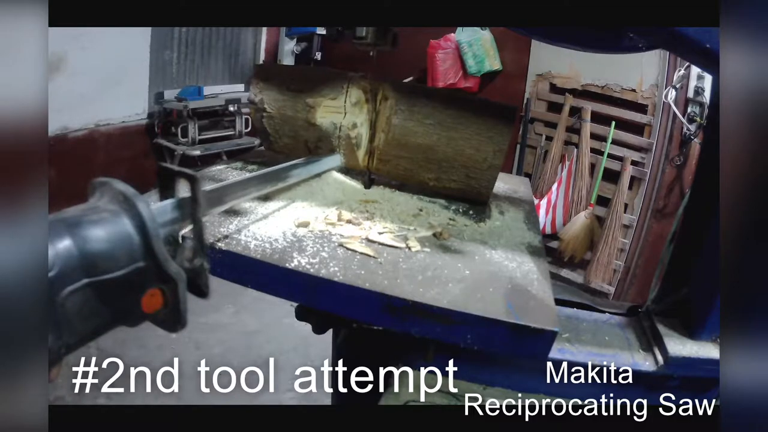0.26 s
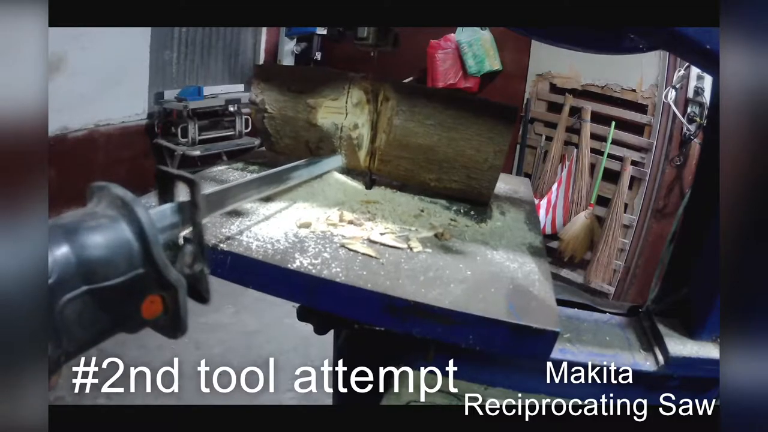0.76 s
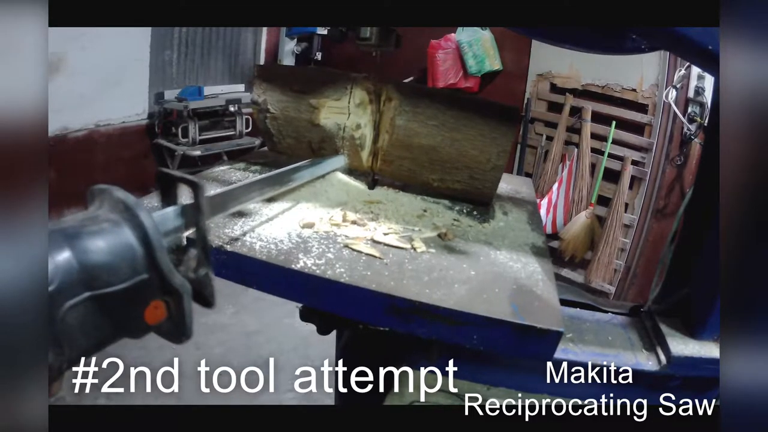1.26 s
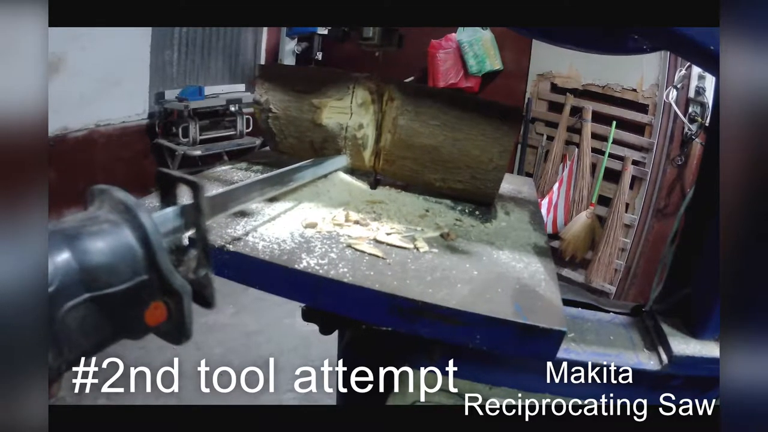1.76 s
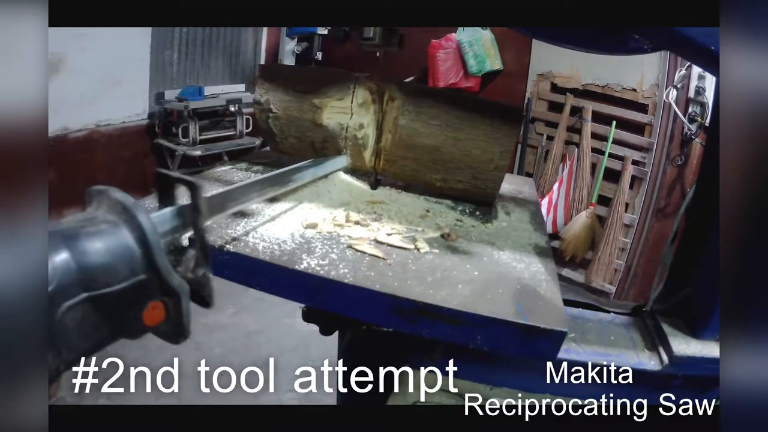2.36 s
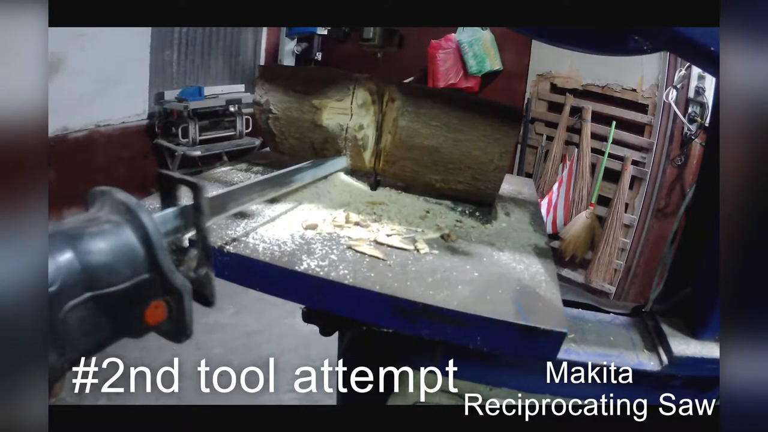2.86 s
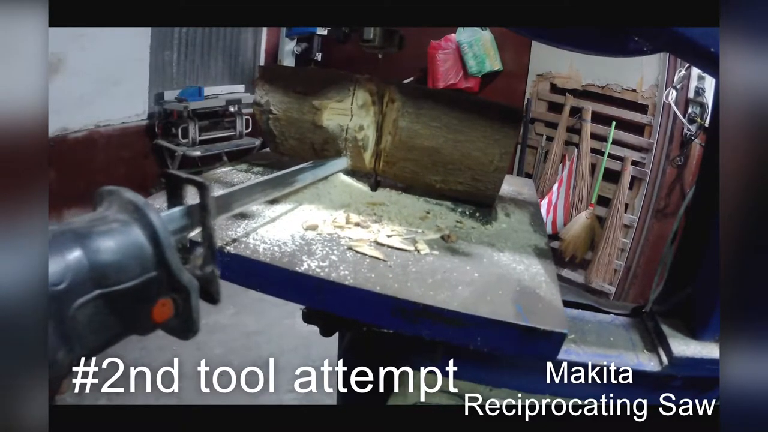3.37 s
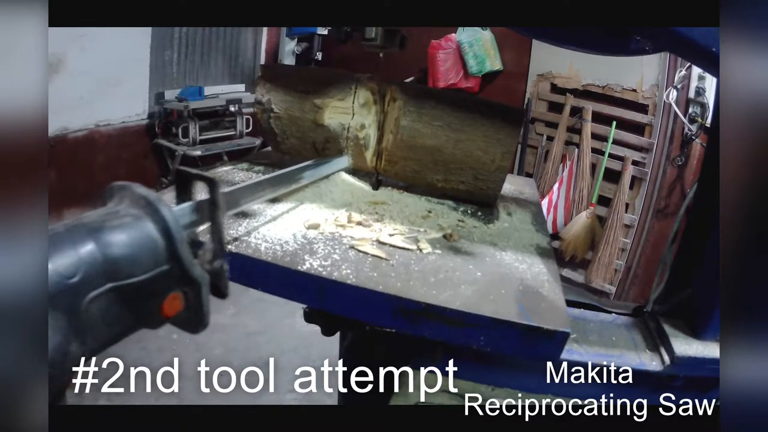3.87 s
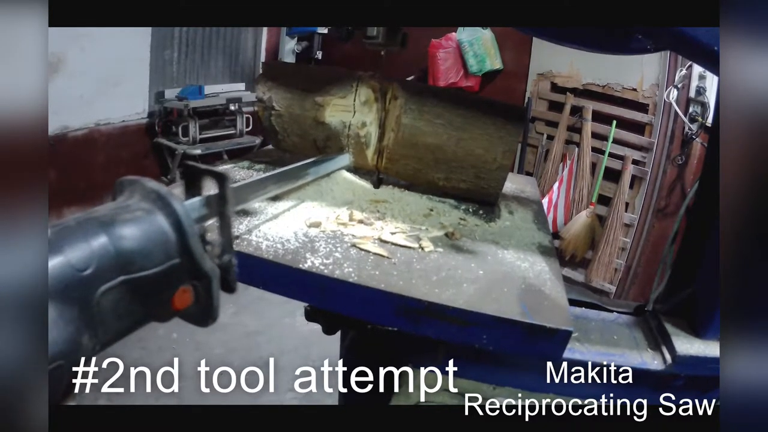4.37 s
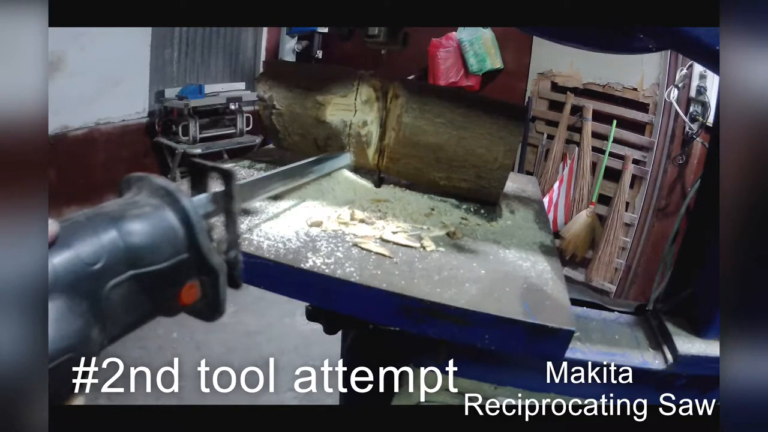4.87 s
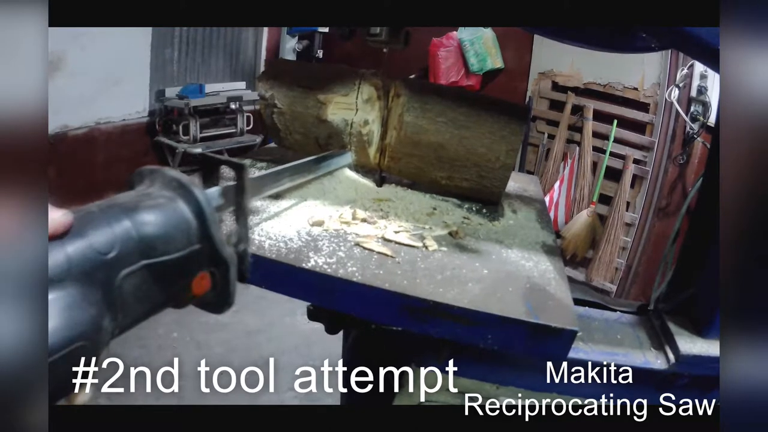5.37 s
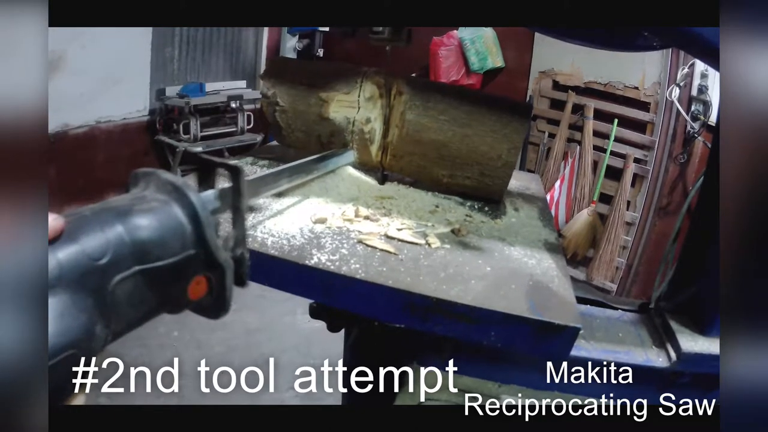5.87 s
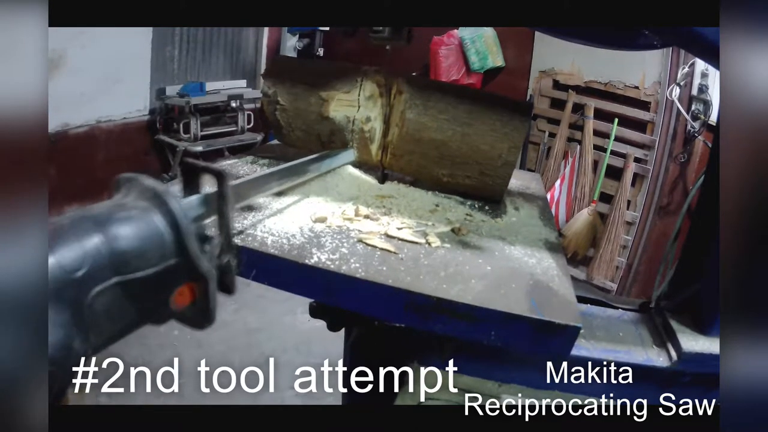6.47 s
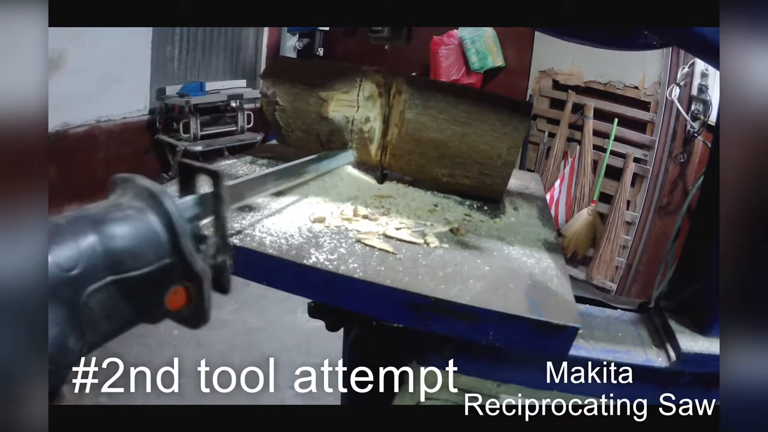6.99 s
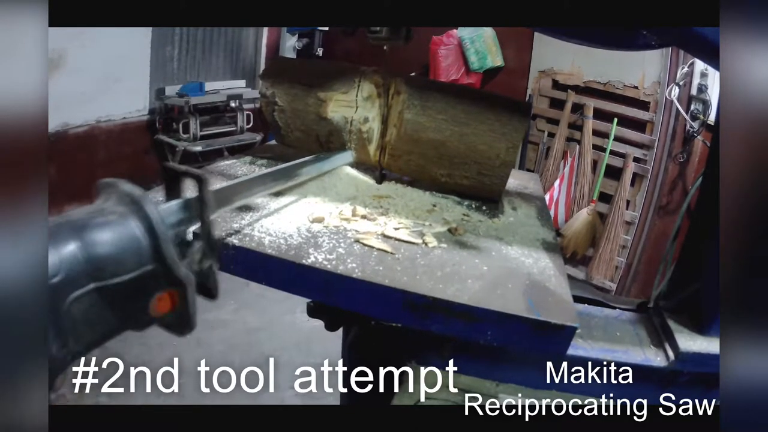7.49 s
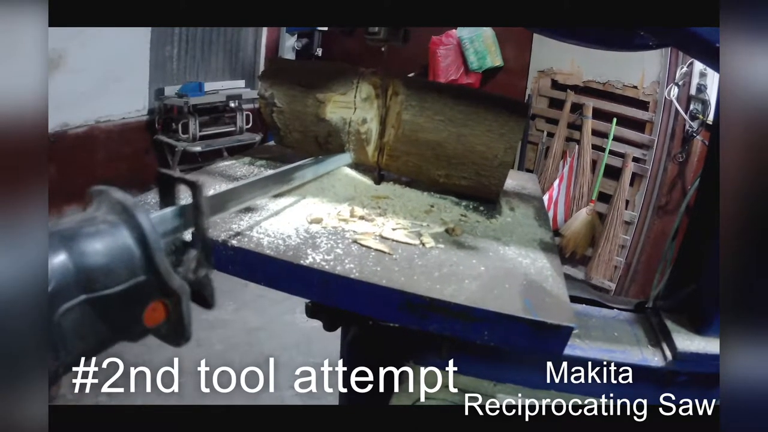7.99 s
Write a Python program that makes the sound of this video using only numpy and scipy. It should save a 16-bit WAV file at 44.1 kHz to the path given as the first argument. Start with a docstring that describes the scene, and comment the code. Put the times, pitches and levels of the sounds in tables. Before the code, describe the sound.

A power saw heard in slow motion chugs through a log with rapid woody knocking, dull rasping and a thin metallic sizzle on top.

```python
"""Reciprocating saw in slow motion

In a workshop a reciprocating saw cuts steadily into a round log on a steel table; one microphone channel.
Each turn of the crank knocks blade and shoe against the log several times: clicks and rattle ring its modes.
The teeth rasp as coloured noise; the motor hums and whines in sines; near walls answer the knocks.
The saw is heard at quarter speed: silent gaps between samples mirror it into a metallic sizzle around 11 kHz.
Faint dry ticks keep an even beat in the treble."""
import sys
import numpy as np
from scipy import signal
from scipy.fft import rfft, irfft
from scipy.io import wavfile
from scipy.ndimage import uniform_filter1d, map_coordinates

SR = 44100
rng = np.random.default_rng(int(sys.argv[2]) if len(sys.argv) > 2 else 0)


def materialize(psi):
    """Save the field psi as 16-bit PCM at rate SR to the path in sys.argv[1].

    A 1-D psi becomes a single channel; in a 2-D psi each row is a channel.
    """
    bounded = np.clip(np.atleast_2d(psi).T, -1, 1)
    quanta = np.round(bounded * 32767).astype(np.int16)
    wavfile.write(sys.argv[1], SR, quanta)


N = 363384


def from_db(db):
    """Amplitude factor of a level in dB."""
    return 10 ** (np.asarray(db) / 20)


def rms_one(x):
    """Scales a signal to rms 1."""
    return x / np.sqrt(np.mean(x ** 2) + 1e-20)


def seconds():
    """The time of every sample."""
    return np.arange(N) / SR


def in_time(rows):
    """The columns of a curve at every sample."""
    s, *columns = np.transpose(rows)
    return [np.interp(seconds(), s, column) for column in columns]


def drift(rate):
    """Smooth chance with about `rate` new values a second; rms 1."""
    knots = rng.standard_normal(N // 40)
    return rms_one(map_coordinates(knots, [seconds() * rate], order=3, mode="wrap"))


def coloured(x, spectrum):
    """Gives a white signal a spectrum with steep ends; rms 1."""
    hz, level_db = np.transpose(spectrum)
    f = np.maximum(np.arange(N // 2 + 1) * SR / N, 1)
    ends = np.minimum(f / hz[0], 1) ** 2 * np.minimum(hz[-1] / f, 1) ** 2
    shape = from_db(np.interp(np.log(f), np.log(hz), level_db))
    return rms_one(irfft(rfft(x) * ends * shape, N))


def band(x, low_hz, high_hz):
    """A causal band-pass."""
    sos = signal.butter(2, [low_hz, high_hz], "band", fs=SR, output="sos")
    return signal.sosfilt(sos, x + 1e-18)


def resonance(x, hz, width_hz):
    """One ringing mode, gain 1 at its peak."""
    r = np.exp(-np.pi * width_hz / SR)
    poles = [1, -2 * r * np.cos(2 * np.pi * hz / SR), r * r]
    return signal.lfilter(np.array([1, 0, -1]) * (1 - r * r) / 2, poles, x)


def clicks(times, sizes):
    """One single-sample click at each time."""
    at = np.round(times * SR).astype(int)
    inside = (at >= 0) & (at < N)
    return np.bincount(at[inside], sizes[inside], N)


def rattle(blows, decay_s):
    """After each blow loose parts chatter and settle: fading noise with as much energy as the blow."""
    fade = np.exp(-1 / (decay_s * SR))
    envelope = signal.lfilter([np.sqrt(1 - fade ** 2)], [1, -fade], blows + 1e-18)
    return envelope * rng.standard_normal(N)


def with_chance(typed, chance, apart_s):
    """The columns of the typed events and of those chance events that keep clear of them."""
    typed = np.array(typed)
    clear = np.abs(chance[:, :1] - typed[:, 0]).min(axis=1) > apart_s
    return np.vstack([typed, chance[clear]]).T


# the ticks that stand out: (time [s], relative level [dB])
LOUD_TICKS = [(0.094, -52), (0.691, -55), (1.288, -52), (1.885, -57), (2.782, -45), (3.677, -49),
              (4.574, -57), (4.872, -50), (5.768, -51), (6.664, -53), (7.859, -49), (8.157, -50)]


def ticks(level_db, crackle_db, spread_s):
    """Faint dry ticks in the treble on an even beat, each amid a puff of tiny crackles."""
    every_s = .29866
    beats = np.arange(.0936, N / SR, every_s)
    faint_db = -67 + 3 * rng.standard_normal(len(beats))
    s, db = with_chance(LOUD_TICKS, np.column_stack([beats, faint_db]), apart_s=every_s / 2)
    offsets, sizes = rng.standard_normal((2, len(s), 80))
    crackle_times = s[:, None] + spread_s * offsets
    crackle_sizes = from_db(db + crackle_db)[:, None] * sizes
    crackles = clicks(crackle_times.ravel(), crackle_sizes.ravel())
    return from_db(level_db) * band(clicks(s, from_db(db)) + crackles, 3000, 8800)


# echo paths off the near walls: (delay after the direct sound [s], level against it [dB])
WALL_ECHOES = [(.0071, -14.5), (0.0118, -10.5), (.0187, -12), (0.027, -25.5), (.0383, -24), (0.0547, -10)]


def workshop(x):
    """Near walls send back a cluster of dull echoes, each later by its longer path."""
    dull = band(x, 55, 1700)
    return x + sum(from_db(db) * np.interp(seconds() - delay, seconds(), dull, left=0)
                   for delay, db in WALL_ECHOES)


# modes of log, table and saw housing: (frequency [Hz], width [Hz], gain [dB])
BODY_MODES = [(57.6, 8.9, -12), (149.4, 14, 5), (193, 18, -2), (209.4, 42, 8), (294.6, 48, 3),
              (349.5, 40, 5.5), (400, 140, -12), (492, 47, 3.5), (540, 55, -15), (736, 420, -9.5),
              (856, 140, -29)]


def body(force):
    """Log, table and housing ring together as parallel resonances."""
    return sum(from_db(db) * resonance(force, hz, width) for hz, width, db in BODY_MODES)


def machine_line(turn, multiple, db):
    """A sine locked to the crank at a multiple of its speed, its phase wandering slightly; level in dB rms."""
    phase = multiple * turn + rng.random() + .12 * drift(3)
    return np.sqrt(2) * from_db(db) * np.sin(2 * np.pi * phase)


# shaking of the table: (time [s], level [dB rms])
TABLE_LEVEL = [(0, -55), (2.6, -52.5), (3.4, -59), (6.3, -58), (8.24, -65)]


def table_shaking(turn, waver_db):
    """The fifth multiple of the crank speed sets the steel table shaking."""
    level_db, = in_time(TABLE_LEVEL)
    return machine_line(turn, 5, level_db + waver_db * drift(5.3))


# shaking of the saw: (multiple of the crank speed, level [dB rms])
SAW_SHAKE = [(4, -63), (7, -65), (13, -57), (15, -56), (16, -47), (19, -45), (31, -47.5), (44, -45.5),
             (46, -55.5)]


def saw_shaking(turn, waver_db):
    """The crank shakes the saw at multiples of its own speed."""
    return sum(machine_line(turn, k, db + waver_db * drift(4)) for k, db in SAW_SHAKE)


# hum of the motor's rotor: (time [s], level [dB rms])
ROTOR_HUM = [(0, -51), (2, -48.5), (4.6, -60), (5.2, -53), (7.2, -47), (8.24, -49)]
# whine of gear and fan: (multiple of the rotor speed, level [dB rms])
GEAR_WHINE = [(18, -51.5), (20, -67), (38, -58.5)]


def motor(turn, waver_db, whine_waver_db):
    """The rotor hums at its speed; its gear and fan whine at multiples of it."""
    gear_ratio = 8.82  # turns of the rotor for one turn of the crank
    hum_db, = in_time(ROTOR_HUM)
    hum = machine_line(turn, gear_ratio, hum_db + waver_db * drift(3.7))
    whine = sum(machine_line(turn, k * gear_ratio, db + whine_waver_db * drift(27))
                for k, db in GEAR_WHINE)
    return hum + whine


# spectrum of the rumbling log: (frequency [Hz], relative level [dB per Hz])
RUMBLE_SPECTRUM = [(18, -30.5), (30, -20), (50, -20.5), (80, -5), (120, -5), (170, -2.5), (260, 1),
                   (340, 5), (460, -0.5), (520, 2.5), (650, -8), (900, -17)]


def rumble():
    """Between knocks the log keeps rumbling under the dragging blade: steady coloured noise, rms 1."""
    return coloured(rng.standard_normal(N), RUMBLE_SPECTRUM)


# spectrum of the teeth: (frequency [Hz], relative level [dB per Hz])
RASP_SPECTRUM = [(700, 3.5), (1000, -3), (1350, -6.5), (1600, 0), (1800, 3), (1980, 0.5), (2250, 2),
                 (2450, -2.5), (2560, -8), (2700, -1.5), (3000, -0.5), (3230, 4.5), (3600, -2.5),
                 (3900, -19.5)]


def teeth(turn, bite_db, reversal_turn, grain_db, patchy_db):
    """Teeth snap thousands of fibres a second, and bite hardest about each reversal of the blade, easing over
    the half turn."""
    snaps = rng.standard_normal(N) * from_db(grain_db * rng.standard_normal(N))
    since_reversal = (2 * (turn - reversal_turn)) % 1  # 0-1 within each half turn
    rasp = coloured(snaps * from_db(-bite_db * since_reversal), RASP_SPECTRUM)
    # the rasp flickers: each narrow range of pitch swells and fades by itself
    _, _, cells = signal.stft(rasp, nperseg=1024)
    swell = uniform_filter1d(rng.standard_normal(cells.shape), size=3, axis=0)
    swell = rms_one(uniform_filter1d(swell, size=4, axis=1))
    _, flickering = signal.istft(cells * from_db(patchy_db * swell))
    return rms_one(flickering[:N])


# contacts in every turn of the crank: (place in the turn [0-1], relative level [dB],
# lowest frequency [Hz], highest frequency [Hz], rattle decay [s], rattle against the blow [dB])
CONTACTS = [(0.97, -2, 406, 897, 0.0086, 2), (0.0, -0.5, 251, 467, 0.005, 0),
            (.172, 0.5, 250, 543, 0.005, -1), (.255, -5.5, 357, 790, 0.004, -1.5),
            (.458, 0.5, 421, 688, 0.014, 4.5), (.605, 1.5, 386, 620, 0.0044, -1),
            (.635, 2, 161.4, 233, 0.0031, -12), (0.98, 2.5, 136, 221, 0.0036, -8),
            (0.585, 5, 49.5, 112, .003, -15.5), (.35, -5, 41, 79, .003, -24)]


def knocking(turn, jitter_s, uneven_db, direct_db):
    """The same contacts come round with every turn, each a blow followed by a short random rattle."""
    force = 0
    whole_turns = np.arange(-1, np.ceil(turn[-1]) + 1)
    for place, db, low_hz, high_hz, rattle_s, rattle_db in CONTACTS:
        late, strong = rng.standard_normal((2, len(whole_turns)))
        times = np.interp(whole_turns + place, turn, seconds(), left=-1, right=-1) + jitter_s * late
        blows = clicks(times, from_db(db + uneven_db * strong))
        chatter = from_db(rattle_db) * rattle(blows, rattle_s)
        force = force + band(blows + chatter, low_hz, high_hz)
    return rms_one(workshop(body(force) + from_db(direct_db) * force))


def catches(turn):
    """Now and then the teeth catch just as the blade reverses: rows (time [s], relative level [dB])."""
    reversal_turn, chances = .975, (.2, .12)  # the chance of a catch at each end of the stroke
    halves = np.arange(2 * int(turn[-1]))
    s = np.interp(reversal_turn - 1 + halves / 2, turn, seconds())
    db = -20 + 1 * rng.standard_normal(len(s))
    caught = rng.random(len(s)) < np.take(chances, halves % 2)
    return np.column_stack([s, db])[caught]


# the hardest catches: (time [s], relative level [dB])
HARD_CATCHES = [(0.442, -11), (0.752, -12.5), (1.025, -15), (2.287, -12), (3.075, -18), (3.812, -14.5),
                (3.899, -10.5), (4.25, -16), (4.337, -14), (4.646, -11.5), (4.91, -10.5), (5.39, -17),
                (5.876, -17.5), (7.605, -10.5)]


def jolts(turn, thud_db, crack_db):
    """A caught tooth lets go: a crack, and a thud in the log."""
    s, db = with_chance(HARD_CATCHES, catches(turn), apart_s=.02)
    blows = clicks(s, from_db(db))
    thud = body(band(blows + rattle(blows, decay_s=0.0039), 296, 756))
    crack = band(blows + 0.23 * rattle(blows, decay_s=0.004), 370, 1150)
    return workshop(from_db(thud_db) * thud + from_db(crack_db) * crack)


def scattered_dips():
    """Brief drops in level at chance times, rows as in MARKED_DIPS; more bass lost, weaker tone."""
    per_s, length_s, depth_db = 2, .01, 13
    count = int(per_s * N / SR)
    late, bass_share = rng.random((2, count))
    s = (np.arange(count) + late) / per_s
    hz = 426 * 2 ** (0.33 * rng.standard_normal(count))  # spread of a third of an octave
    tone_db = -25.5 - 13.5 * bass_share
    return np.column_stack(np.broadcast_arrays(s, length_s, depth_db, bass_share, hz, tone_db))


# the marked dips: (time [s], length [s], depth [dB], share of the drop in the bass [0-1],
# tone frequency [Hz], tone peak level [dB])
MARKED_DIPS = [(0.455, 0.011, 28, 0.15, 498, -24.5), (0.619, 0.012, 14, .3, 289, -26),
               (0.933, 0.018, 49, 0.7, 497, -23), (1.711, 0.011, 12, 0.6, 583, -24),
               (2.815, 0.024, 42, 0, 3200, -35), (3.175, 0.013, 14, 0, 330, -25),
               (4.477, 0.016, 15, .9, 514, -39), (5.195, 0.011, 15, 0.2, 317, -22.5),
               (6.063, 0.023, 23, 0, 1826, -33), (6.518, 0.017, 12, .3, 356, -21),
               (7.261, 0.012, 16, 0.1, 309, -24), (7.923, 0.018, 46, 1, 3240, -34)]


def dipped(x, bass_hz, tone_s, tone_lead_s):
    """Now and then the level drops for a moment, the bass often less, while one short tone hangs on."""
    drop_db, bass_drop_db, tones = np.zeros((3, N))
    for s, length, depth, bass_share, hz, db in with_chance(MARKED_DIPS, scattered_dips(), apart_s=.1).T:
        near = np.abs(np.arange(N) - s * SR) < SR / 20
        t = np.flatnonzero(near) / SR - s
        drop = depth * np.exp(-np.abs(1.25 * t / length) ** 3)
        drop_db[near] += drop
        bass_drop_db[near] += bass_share * drop
        swell = np.exp(-((t + tone_lead_s) / tone_s) ** 2)
        tones[near] += from_db(db) * swell * np.sin(2 * np.pi * (hz * t + rng.random()))
    bass = signal.sosfiltfilt(signal.butter(8, bass_hz, fs=SR, output="sos"), x)
    return bass * from_db(-bass_drop_db) + (x - bass) * from_db(-drop_db) + tones


def slow_motion(x, top):
    """Rounds peaks and narrows the band as at quarter speed; three silent samples in four mirror it at SR / 4."""
    rounded = top * np.tanh(x / top)
    narrow = signal.sosfilt(signal.ellip(10, .3, 62, 3972, fs=SR, output="sos"), rounded)
    return 4 * narrow * (np.arange(N) % 4 == 0)  # 4 makes up for the silent samples


# crank speed as heard, sagging late in the cut: (time [s], speed [turns per s])
CRANK_SPEED = [(0, 11.351), (1.1, 11.368), (2.4, 11.436), (4.2, 11.453), (5.4, 11.353), (7.3, 11.273),
               (8.24, 11.301)]


def crank():
    """The turns of the crank so far, its speed summed over time."""
    speed, = in_time(CRANK_SPEED)
    return -.033 + np.cumsum(speed) / SR


# how hard the saw works: (time [s], relative knocking level [dB], relative rasp level [dB])
SAW_EFFORT = [(0.0, -27.5, -34.0), (0.8, -26, -33), (1.81, -27.5, -33.5), (2.21, -25, -33),
              (2.61, -27.5, -31.5), (2.81, -26, -32), (3.62, -25, -33), (4.02, -25.5, -33.0),
              (5.02, -25.6, -32.5), (5.23, -23.9, -32.0), (6.03, -24.5, -33), (8.24, -26, -33)]


def scene():
    """The crank drives the saw on the log; the ticks lie outside its slow motion."""
    turn = crank()
    knock_db, rasp_db = in_time(SAW_EFFORT)
    grip_db = 0.5 * drift(14)  # the blade binds and frees itself in the kerf
    shaking = table_shaking(turn, waver_db=1.25) + saw_shaking(turn, waver_db=2.5)
    machine = shaking + motor(turn, waver_db=2.5, whine_waver_db=3.5)
    drag = from_db(-8 + knock_db + grip_db) * rumble()
    rasp = teeth(turn, bite_db=1.0, reversal_turn=.455, grain_db=1.5, patchy_db=2.0)
    rasp = from_db(-1.12 + rasp_db + .5 * grip_db) * rasp
    knocks = knocking(turn, jitter_s=.0004, uneven_db=2.0, direct_db=-9.0)
    knocks = from_db(-4.5 + knock_db + grip_db) * knocks
    saw = machine + drag + rasp + knocks + jolts(turn, thud_db=27, crack_db=13.5)
    saw = dipped(saw, bass_hz=530, tone_s=0.016, tone_lead_s=0.0026)
    beat = ticks(level_db=29, crackle_db=-19.5, spread_s=0.012)
    return (slow_motion(saw, top=0.27) + beat)[None]


def record(dry):
    """The top is cut steeply: 70 dB down from 15.7 kHz."""
    return signal.sosfilt(signal.cheby2(16, 70, 15700, fs=SR, output="sos"), dry)


dry = scene()
out = record(dry)
materialize(out)
```